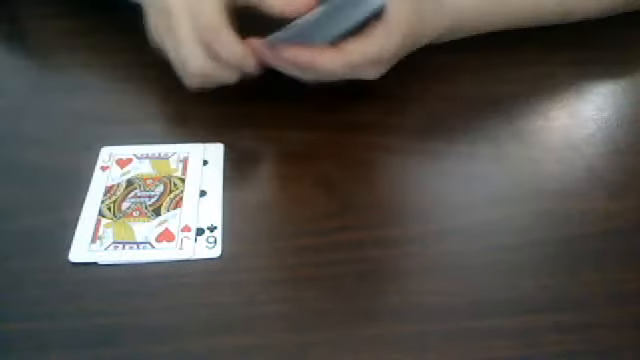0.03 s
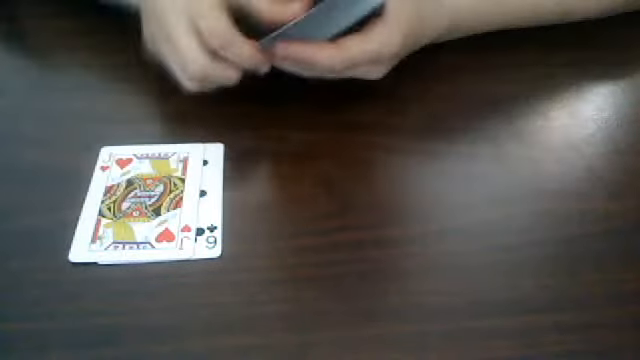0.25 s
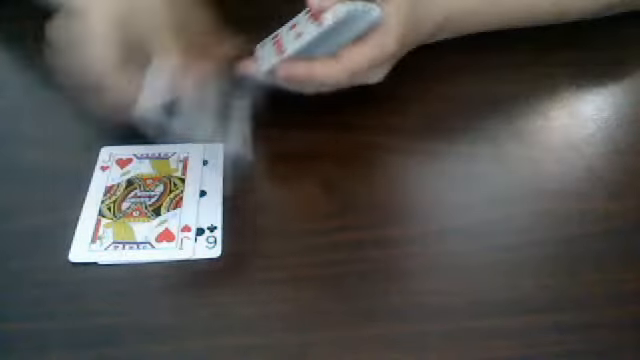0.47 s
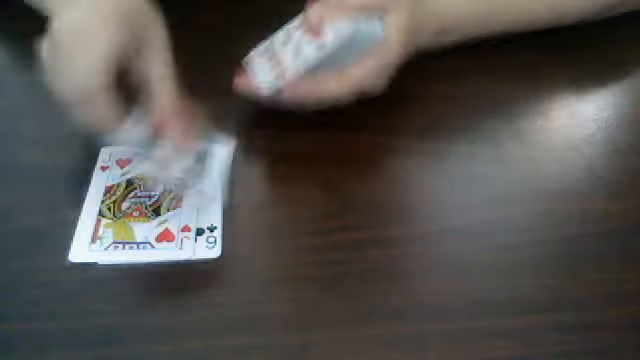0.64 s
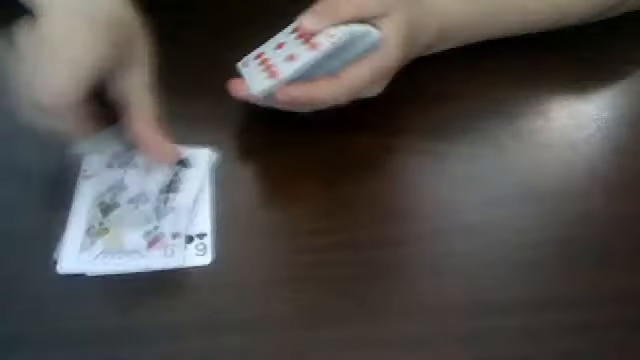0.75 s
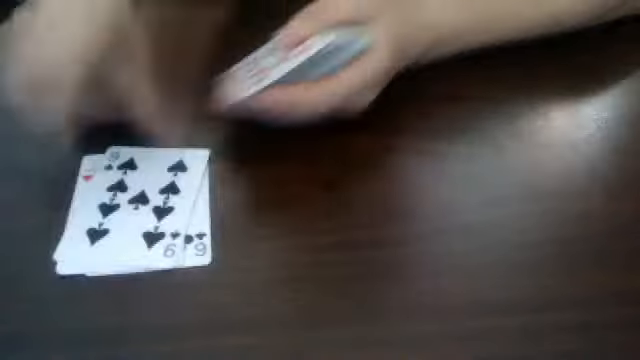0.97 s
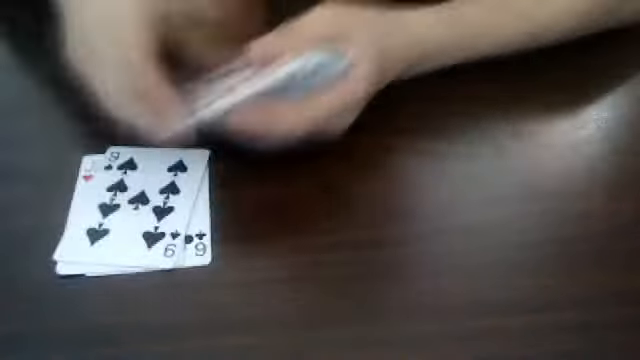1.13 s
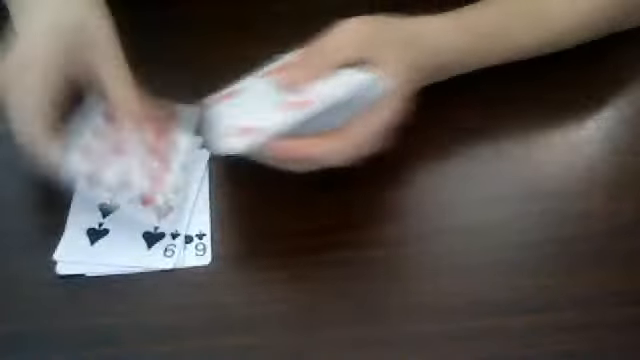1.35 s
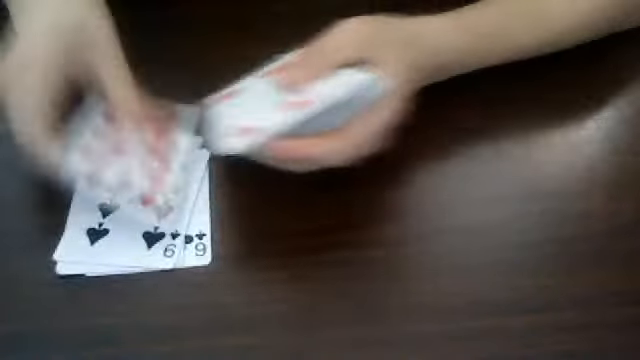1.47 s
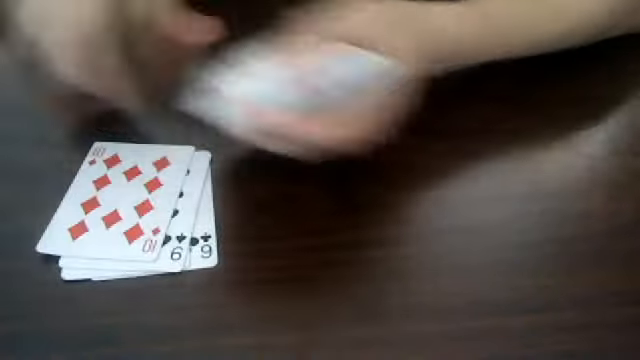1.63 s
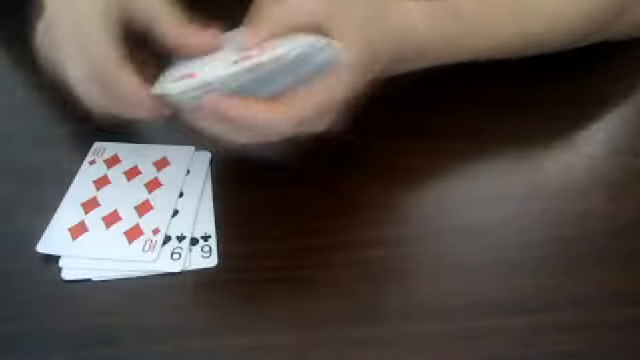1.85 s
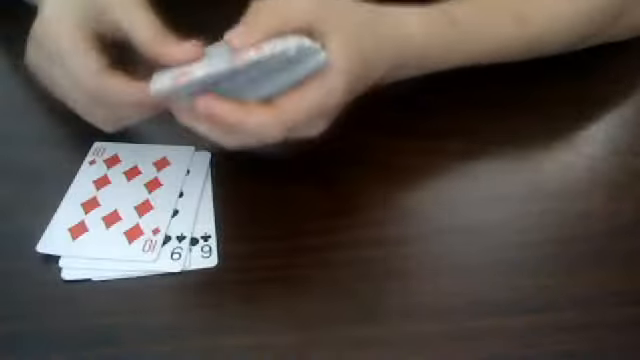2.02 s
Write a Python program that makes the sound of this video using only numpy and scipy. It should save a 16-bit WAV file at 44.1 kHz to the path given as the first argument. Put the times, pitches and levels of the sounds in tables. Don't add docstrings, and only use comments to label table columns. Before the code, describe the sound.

Card dealing: papery scrapes, crisp snaps and slaps, then soft low table bumps in a small room

```python
import sys
import numpy as np
from scipy import signal
from scipy.fft import rfft, irfft, next_fast_len
from scipy.io import wavfile
from scipy.ndimage import uniform_filter1d, map_coordinates

SR = 44100
rng = np.random.default_rng(int(sys.argv[2]) if len(sys.argv) > 2 else 0)


def how_loud(loudness_db):
    steps = np.asarray(loudness_db, float) / 20
    return 10 ** steps


def log_audio(samples):
    frames = np.atleast_2d(samples).T
    limited = np.clip(frames, -1, 1)
    pcm = np.round(limited * 32767).astype(np.int16)
    wavfile.write(sys.argv[1], SR, pcm)


N = 91904
T = np.arange(N) / SR

# time_s, level_db
STROKES = [
    [(.19, -73), (.225, -48.5), (.243, -33), (.31, -30), (.37, -34.5), (.43, -39)],
    [(.43, -37), (.5, -46), (.66, -55), (.745, -67.5)],
    [(.75, -61), (.77, -34), (.79, -37), (.83, -42), (.9, -49.5)],
    [(.912, -52), (.92, -35), (.95, -31), (1.015, -38), (1.04, -48), (1.14, -54)],
    [(1.14, -54.5), (1.19, -33), (1.22, -28.5), (1.26, -35), (1.335, -34.5)],
    [(1.34, -28), (1.38, -40.5), (1.43, -51.5), (1.45, -50.5)],
    [(1.455, -29.5), (1.478, -29), (1.485, -41.5), (1.53, -51), (1.58, -70)],
    [(1.55, -58), (1.65, -45), (1.72, -53), (1.82, -68), (1.95, -78.5), (2.08, -76.5)],
]
# centre_hz, width_hz, level_db
THUMBED_CARD = [(1315, 120, -9.5), (2140, 180, -10), (3110, 230, -20), (3700, 360, -6.5), (4706, 280, -2.5),
                (5720, 620, -5.5), (6340, 630, -7.5)]
CARRIED_CARD = [(1128, 93, -3), (1430, 150, -11.5), (2290, 300, -1), (3117, 250, -4), (4370, 590, -5),
                (5560, 860, -10.5)]
LAID_CARD = [(1200, 410, -1.5), (2220, 300, 1), (3200, 570, -4.5), (4480, 1100, -4), (5830, 720, -5)]
FANNED_CARD = [(1150, 60, -18), (2480, 180, -10), (3290, 90, -7), (3870, 200, -8), (4180, 70, -8),
               (4510, 70, 0), (4750, 60, -2), (4910, 70, 0), (5220, 80, -2), (5450, 90, -4), (5820, 60, -3),
               (5950, 70, -1)]
DRAWN_CARD = [(1330, 240, -10), (2100, 400, -1.5), (3120, 400, -1), (4300, 1000, -8), (5600, 560, -1),
              (6300, 500, -8)]
SETTLING_CARD = [(1080, 230, -15), (2100, 140, -8), (2900, 660, -1), (4300, 600, -8), (5900, 1100, -10)]
SQUARED_CARD = [(1060, 96, -10), (1460, 110, -25), (2250, 87, 1.5), (2700, 45, 0), (2800, 53, 1),
                (3400, 100, -35), (5300, 900, -45.5)]
# centre_hz, width_hz, level_db
FLICKED_CARD = [(1000, 200, -20), (2750, 400, 0), (3600, 700, 0), (4900, 1100, -2), (5900, 700, -4)]
# start_s, peak_db, brightness_hz, t60_s
EDGE_SNAPS = [(.4345, -14, 4200, 0.015), (.4612, -17, 3500, .012), (0.5128, -19, 1800, 0.028),
              (0.565, -29, 2250, .03), (0.6006, -29, 2330, 0.025), (0.6436, -25, 2370, .035),
              (.7665, -25, 3000, .05), (0.7798, -11, 2600, 0.018), (.7865, -21, 3000, .02),
              (.7915, -19, 3300, .012), (0.7998, -16, 4200, .008), (0.8022, -18, 2400, 0.02),
              (.8095, -24, 2500, .02), (.8398, -21, 2400, .015), (1.0726, -38, 1500, 0.14),
              (1.2121, -15.5, 3000, .012), (1.224, -10, 1700, 0.016), (1.226, -7.5, 1797, 0.018),
              (1.2293, -8.5, 1813, 0.038), (1.337, -3.5, 2800, 0.014), (1.3425, -15, 2600, 0.04),
              (1.347, -17, 2300, .03), (1.3528, -5, 3800, 0.02), (1.3582, -12, 3600, .02),
              (1.4497, -13, 3500, 0.019), (1.4525, -11, 3500, .015), (1.4598, -17, 3500, 0.047),
              (1.4755, -21, 4800, .012), (1.6516, -30, 1900, .03), (1.6771, -31, 1900, .03),
              (1.70, -39, 1900, .03)]
# start_s, length_s, pitch_hz, level_db
TABLE_THUMPS = [(.56, 0.063, 75, -33.5), (.595, .04, 70, -28), (.635, .035, 72, -35.5),
                (.6, .06, 140, -34.5), (0.7, 0.047, 168, -32), (0.76, 0.03, 165, -52),
                (.805, 0.06, 55, -36.5), (.8, 0.03, 180, -41), (.828, .04, 135, -29.5),
                (.895, 0.045, 150, -48), (0.557, 0.054, 350, -51), (.638, 0.0382, 355, -42),
                (.83, 0.028, 380, -54), (0.428, .04, 460, -41), (.428, .03, 610, -45),
                (0.205, 0.035, 610, -55), (1.62, .035, 100, -39.5), (1.645, .1, 128, -26.5),
                (1.645, .07, 175, -35.5), (1.65, 0.042, 55, -30.5), (1.7, .065, 80, -27),
                (1.71, 0.125, 42, -29), (1.75, 0.042, 150.5, -30), (1.77, 0.019, 58, -27),
                (1.81, 0.025, 62, -26), (1.845, 0.03, 155, -50), (1.67, .045, 340, -51),
                (1.23, .04, 235, -48), (1.53, .05, 170, -62), (1.88, .08, 40, -55), (.09, .05, 195, -77),
                (1.36, .05, 170, -57), (2.04, .04, 210, -68), (1.12, .03, 70, -68), (.72, .04, 60, -58),
                (1.03, .07, 325, -64), (2.02, .06, 40, -65)]
# start_s, length_s, pitch_hz, level_db
LONE_MODES = [(1.213, .03, 632, -34), (1.213, .03, 981, -34), (1.346, .02, 452, -46),
              (1.45, 0.028, 482, -46.5), (.39, 0.025, 1292, -37), (.43, .015, 1250, -35),
              (0.2, .055, 1930, -49), (.21, .04, 1300, -50), (0.875, 0.04, 1400, -47.5),
              (0.945, 0.05, 2410, -43), (.91, .04, 2550, -47), (1.065, .04, 1320, -50),
              (.764, .025, 2280, -32), (.765, .025, 1540, -34), (.797, .015, 1150, -38),
              (1.16, .05, 2150, -42), (.855, .04, 4450, -51), (1.906, 0.068, 1414, -69),
              (1.985, .09, 2744, -56), (2.021, 0.043, 2975, -51), (1.03, .05, 175, -65),
              (1.12, .04, 190, -66), (1.66, 0.16, 2790, -60), (1.53, .06, 2680, -53),
              (1.219, .018, 1280, -27), (1.215, .022, 1480, -26), (1.22, .018, 2050, -25),
              (1.333, .025, 1500, -31), (1.335, .028, 1050, -37), (1.448, .025, 1000, -45),
              (1.64, .06, 1080, -50), (1.645, .05, 1480, -51), (1.645, .05, 2260, -47),
              (.51, .02, 1450, -42)]
# frequency_hz, t60_s
ROOM_DECAY = [(300, 0.064), (2000, .15), (7000, .12)]
# frequency_hz, level_db_per_hz
HISS_SPECTRUM = [(30, 12), (250, 9), (700, 0.5), (7000, -7)]
# frequency_hz, gain_db
BAND_LIMIT = [(6300, 0), (7100, -4), (7300, -24), (8200, -27), (8500, -55)]
# frequency_hz, level_db_per_hz
SPILL_SPECTRUM = [(7000, -60), (7300, 0), (10500, -9), (10800, -60)]

STROKE_CARDS = [THUMBED_CARD, CARRIED_CARD, LAID_CARD, FANNED_CARD,
                DRAWN_CARD, SETTLING_CARD, SETTLING_CARD, SQUARED_CARD]

GRAIN_DB, GRAINS_PER_S, BETWEEN_DB = 2, 350, -28.5
FLICK_FROM_S, LIGHT_DB = 1.4, -21.5
SPREAD_OCT, CRACK_DB, SNAP_DB, RISE_S = 0.86, 7, -5, .0005
CARD_LOW_HZ, PUSH_DB, PUSH_HZ = 950, -30, 600
SWELL_S, FADE_S, TRAIL_DB, TRAIL_S = .012, .011, -21, 0.21
WAVER, WAVER_PER_S, UNSTEADY_ABOVE_HZ = 1.153, 110, 220
RATTLE_DB, RATTLE_HZ = -19, 400
THUD_DB, THUD_HZ = -19, 500
ROOM_DB, HISS_DB, OPENS_S = -13.5, -73, .083
SPILL_START_S, SPILL_LENGTH_S, SPILL_DB = 1.331, .018, -57
GATE_DB, GATE_POWER, GATE_FLOOR_DB = -81.5, .6, -6
STREAK_DB, STEADY_DB = 5, -49


def unit(x):
    return x / np.sqrt(np.mean(x ** 2) + 1e-20)


def along(points, hz):
    f, v = np.transpose(points)
    return np.interp(np.log(hz + 1), np.log(f + 1), v)


def wobble(knots_per_s, size):
    knots = rng.standard_normal(int(knots_per_s) + 4)
    return map_coordinates(knots, [np.arange(size) * knots_per_s / SR])


def filtered(x, response):
    m = next_fast_len(len(x) + 8192)
    return irfft(rfft(x, m) * response(np.fft.rfftfreq(m, 1 / SR)), m)[:len(x)]


def shaped_noise(spectrum):
    return unit(filtered(rng.standard_normal(N), lambda hz: how_loud(along(spectrum, hz))))


def body(peaks):
    def response(f):
        total = 0
        for k, (centre_hz, width_hz, db) in enumerate(peaks):
            band = 1j * f * width_hz
            total = total + (-1) ** k * how_loud(db) * band / (centre_hz ** 2 - f * f + band)
        return total
    return response


def snap_tone(peak_db, bright_hz, start_s):
    if peak_db <= LIGHT_DB:
        card = lambda f: body(CARRIED_CARD)(f) ** 2
    else:
        card = body(FLICKED_CARD if start_s > FLICK_FROM_S else LAID_CARD)
    push_db = PUSH_DB if peak_db > LIGHT_DB + 8 else -np.inf

    def tone(f):
        push = how_loud(push_db) * body([(PUSH_HZ, 2 * PUSH_HZ, 0)])(f) ** 2
        radiated = (f * f / (f * f - CARD_LOW_HZ ** 2 - 1j * f * CARD_LOW_HZ)) ** 2
        offset = np.log2((f + 1) / bright_hz) / (SPREAD_OCT * bright_hz / 3000)
        return push + radiated * card(f) * np.exp(-.5 * offset ** 2)
    return tone


def snaps():
    out, t = np.zeros(N + SR), T[:SR // 8]
    for start_s, peak_db, bright_hz, t60_s in EDGE_SNAPS:
        burst = rng.standard_normal(len(t)) * how_loud(-60 * t / t60_s) * (1 - np.exp(-t / RISE_S))
        burst[round(RISE_S * SR)] += 2 * how_loud(CRACK_DB)
        hit = filtered(np.pad(burst, (64, 0)), snap_tone(peak_db, bright_hz, start_s))
        hit = 2 * hit / np.abs(hit).max()
        out[round(start_s * SR) - 64:][:len(hit)] += how_loud(peak_db + SNAP_DB) * hit
    return out[:N]


def slides():
    out, t = np.zeros(N + SR), T[:SR * 3 // 5]
    for rows, card in zip(STROKES, STROKE_CARDS):
        s, db = np.transpose(rows)
        start_s = s[0] - .02
        knots_s = [start_s, *s, s[-1] + 0.028]
        knots_db = [db[0] - 18, *db, db[-1] - 19.5]
        level_db = np.interp(t + start_s, knots_s, knots_db, -200, -200)
        grain = how_loud(GRAIN_DB * wobble(GRAINS_PER_S, len(t)))
        grit = unit(grain * rng.standard_normal(len(t)))

        def steep(f):
            rise = (f / 1500) ** 2
            return np.abs(body(card)(f)) ** 1.474 + how_loud(BETWEEN_DB) * (0.045 + rise) / (1 + rise)

        hand = how_loud(level_db + 1.8 * wobble(60, len(t)))
        out[round(start_s * SR):][:len(t)] += hand * unit(filtered(grit, steep))
    return out[:N]


def rings(rows):
    out, t = np.zeros(N + SR), T[:SR // 3]
    for start_s, length_s, hz, db in rows:
        ramp = np.clip(np.minimum(t / SWELL_S, 1 + (length_s - t) / FADE_S), 0, 1)
        progress = np.clip(t / length_s, 0, 1)
        shape = np.sin(np.pi / 2 * ramp) ** 2 * (0.55 + 0.65 * np.sin(np.pi * progress))
        shape = shape + how_loud(TRAIL_DB - 60 * (t - length_s).clip(0) / TRAIL_S) * progress
        note = np.exp(2j * np.pi * hz * t)
        if hz > UNSTEADY_ABOVE_HZ:
            waver = wobble(WAVER_PER_S, len(t)) + 1j * wobble(WAVER_PER_S, len(t))
            note = note * (0.94 + WAVER * waver)
            db = db - 3.6
        out[round(start_s * SR):][:len(t)] += how_loud(db) * np.sqrt(2) * shape * note.imag
    return out[:N]


def table():
    shake = rings(TABLE_THUMPS)
    loose = np.abs(shake) * rng.standard_normal(N)
    return shake + how_loud(RATTLE_DB) * filtered(loose, lambda hz: 1 / (1 + (hz / RATTLE_HZ) ** 6))


def thud(echo):
    return filtered(np.abs(echo), lambda hz: (hz / (hz + 30)) ** 2 / (1 + (hz / THUD_HZ) ** 4))


def room(x):
    hz, t, z = signal.stft(rng.standard_normal(SR // 3), SR, nperseg=256)
    decay = how_loud(-60 * t / along(ROOM_DECAY, hz)[:, None])
    tail = signal.istft(z * decay, SR, nperseg=256)[1]
    return signal.fftconvolve(np.pad(x, (200, 0)), tail / np.linalg.norm(tail))[:N]


def hiss():
    return shaped_noise(HISS_SPECTRUM) * (T > OPENS_S)


def scene():
    clicks = snaps()
    echo = room(clicks)
    cards = clicks + slides() + rings(LONE_MODES)
    wood = table() + how_loud(THUD_DB) * thud(echo)
    return (cards + wood + how_loud(ROOM_DB) * echo + how_loud(HISS_DB) * hiss())[None]


def spill():
    progress = np.clip((T - SPILL_START_S) / SPILL_LENGTH_S, 0, 1)
    return np.sqrt(np.sin(np.pi * progress).clip(0)) * shaped_noise(SPILL_SPECTRUM)


def suppressed(x):
    hz, _, z = signal.stft(x, SR, nperseg=1024, noverlap=768)
    drift = uniform_filter1d(rng.standard_normal(z.shape), size=2, axis=0)
    drift = unit(uniform_filter1d(drift, size=12, axis=1))
    quiet = 1 / (1 + (np.abs(z) ** 2).mean(axis=0) / how_loud(2 * STEADY_DB))
    z = z * how_loud(STREAK_DB * quiet * drift * (hz[:, None] > 700) - STREAK_DB / 2)
    power = uniform_filter1d(np.abs(z) ** 2, size=3, axis=1)
    gain = np.maximum((power / (power + how_loud(2 * GATE_DB))) ** GATE_POWER, how_loud(GATE_FLOOR_DB))
    return signal.istft(z * gain, nperseg=1024, noverlap=768)[1][None, :N]


def band_limit(x):
    return signal.sosfilt(signal.butter(12, 10700, fs=SR, output="sos"), x)


def record(dry):
    limited = filtered(dry[0], lambda hz: how_loud(along(BAND_LIMIT, hz)) * (hz < 10700))
    mix = suppressed(limited + how_loud(SPILL_DB) * spill())
    return band_limit(mix)


dry = scene()
out = record(dry)
log_audio(out)
```